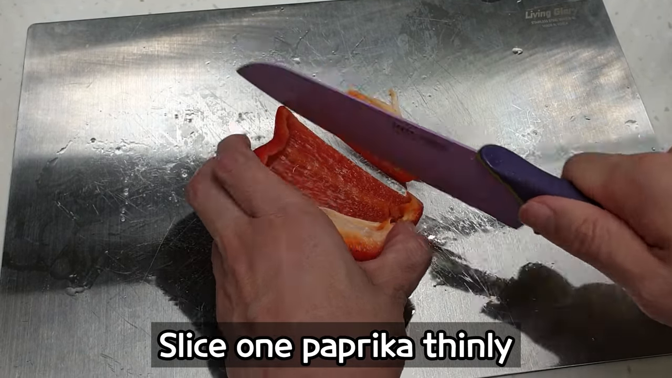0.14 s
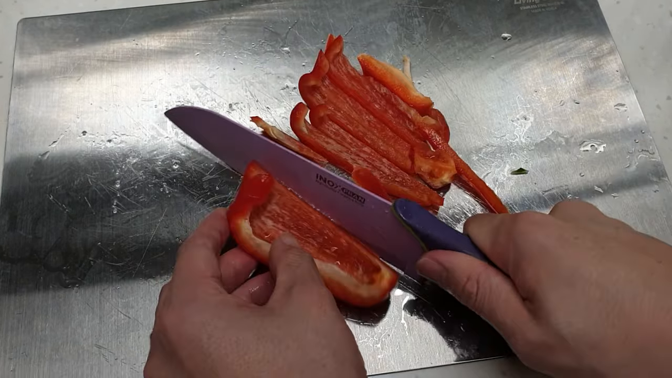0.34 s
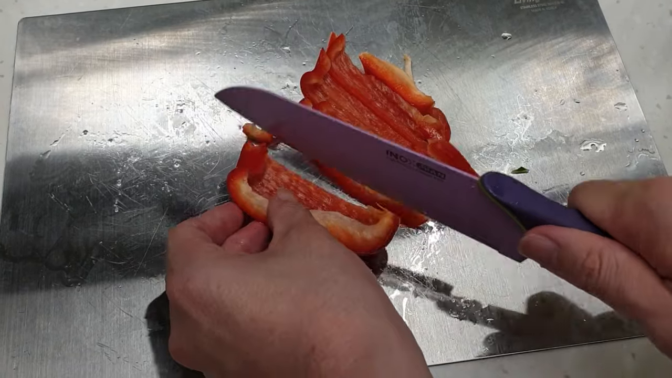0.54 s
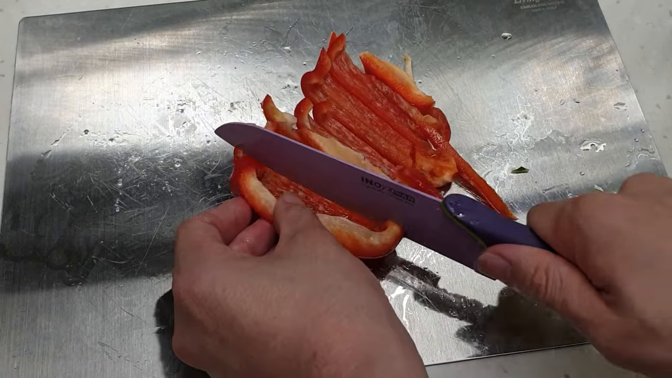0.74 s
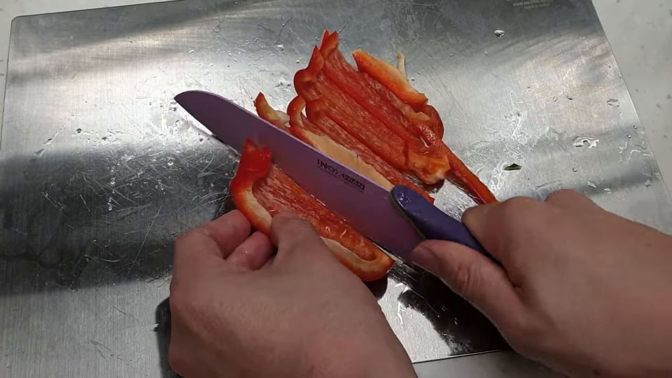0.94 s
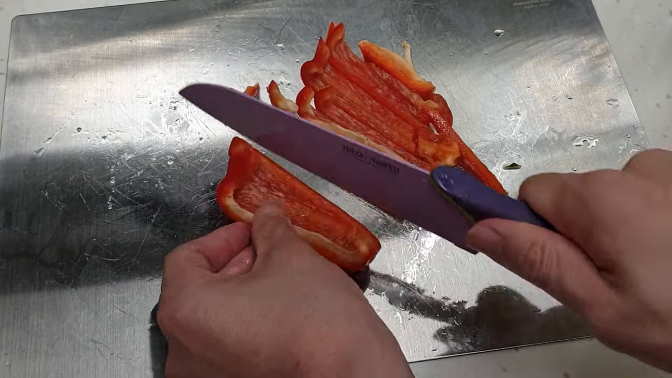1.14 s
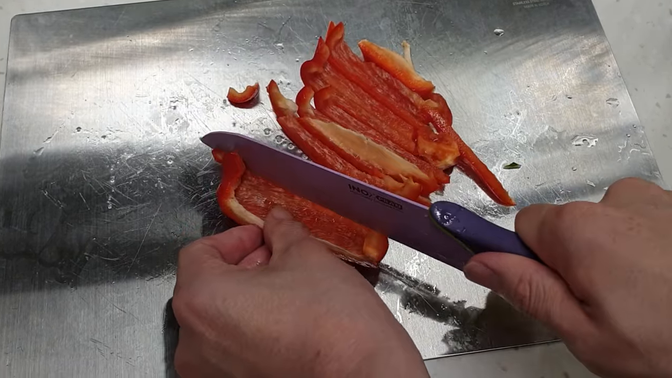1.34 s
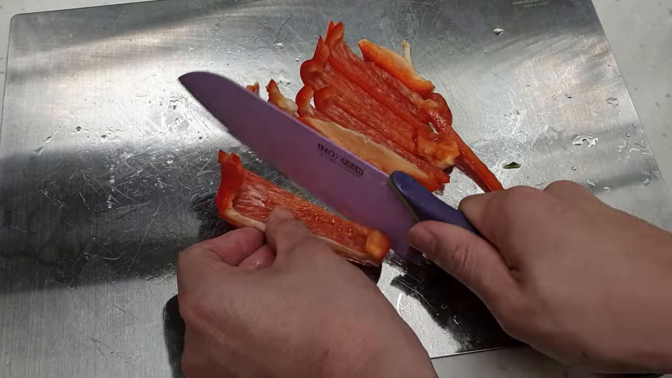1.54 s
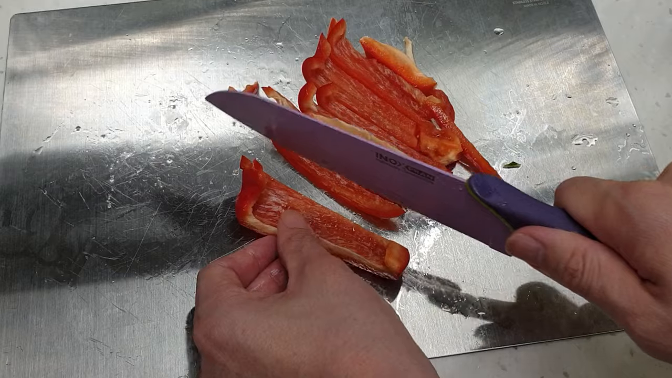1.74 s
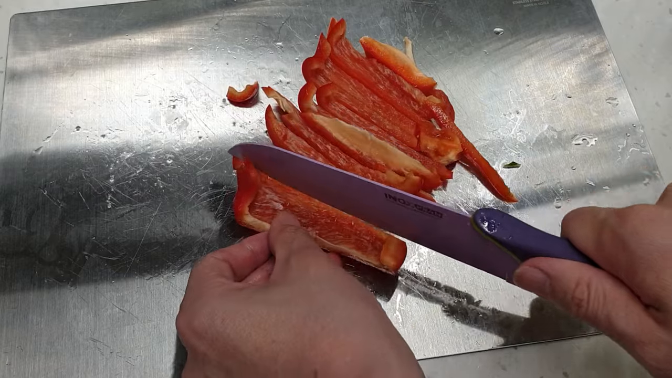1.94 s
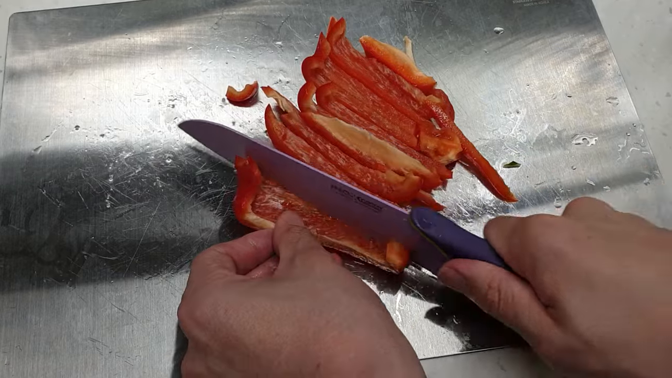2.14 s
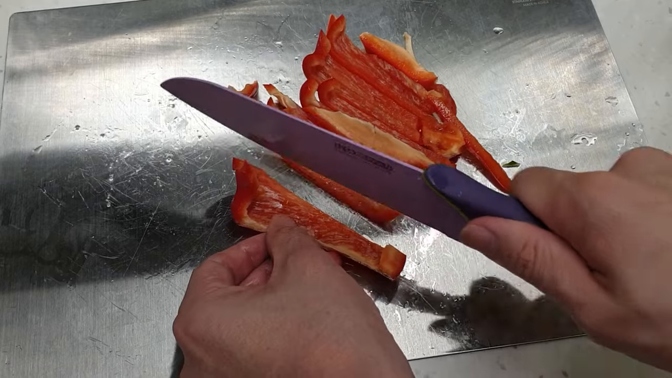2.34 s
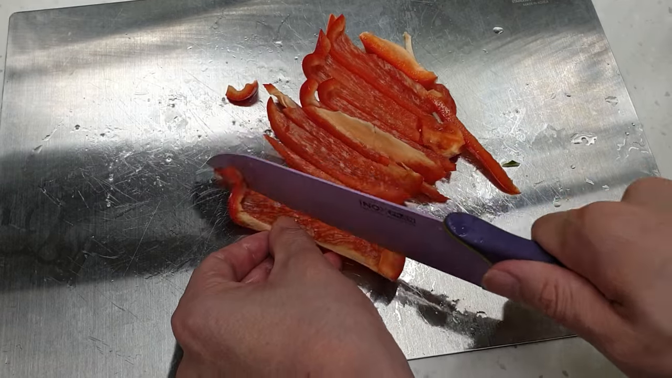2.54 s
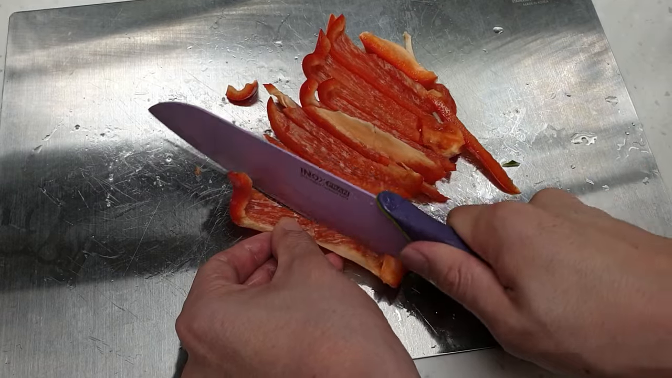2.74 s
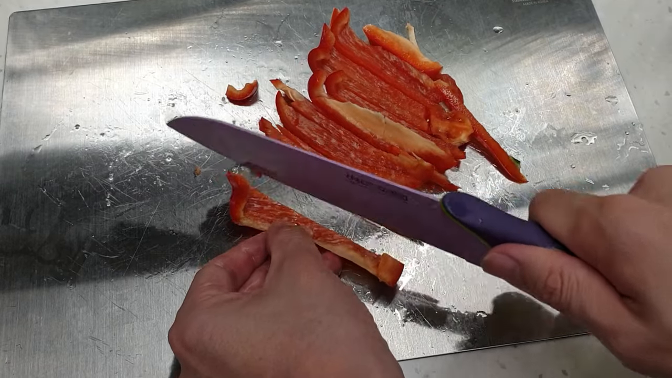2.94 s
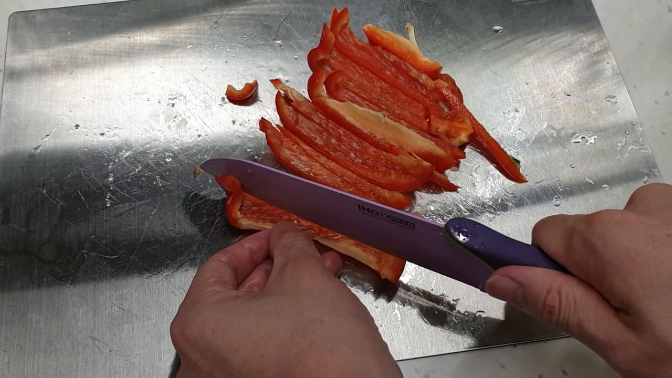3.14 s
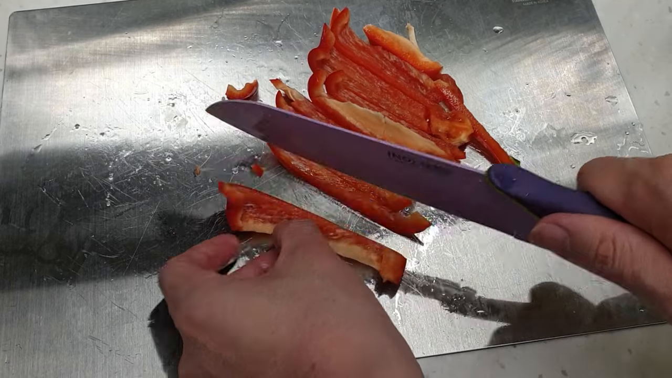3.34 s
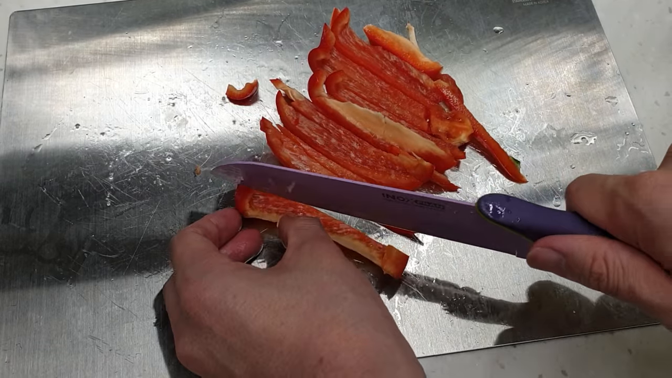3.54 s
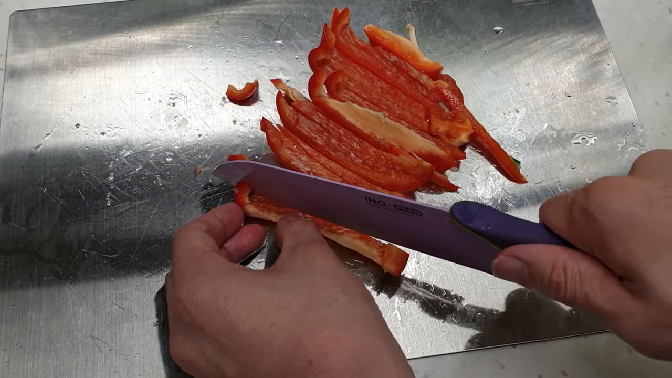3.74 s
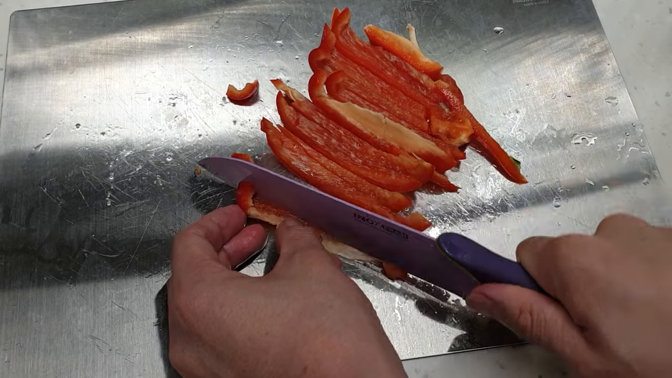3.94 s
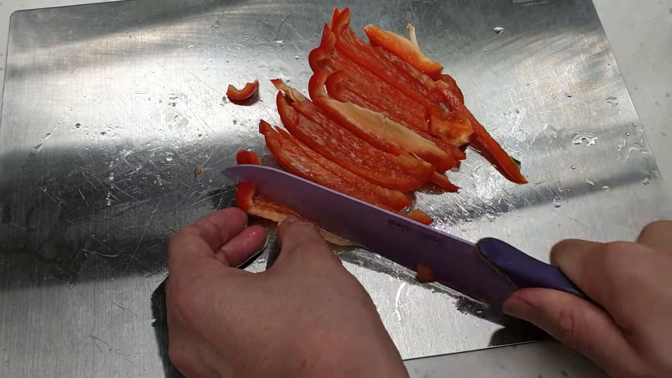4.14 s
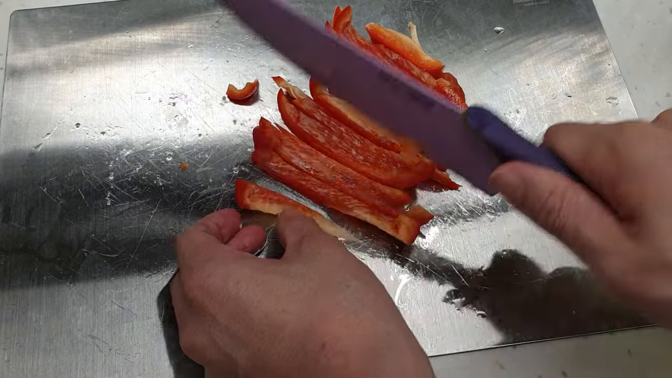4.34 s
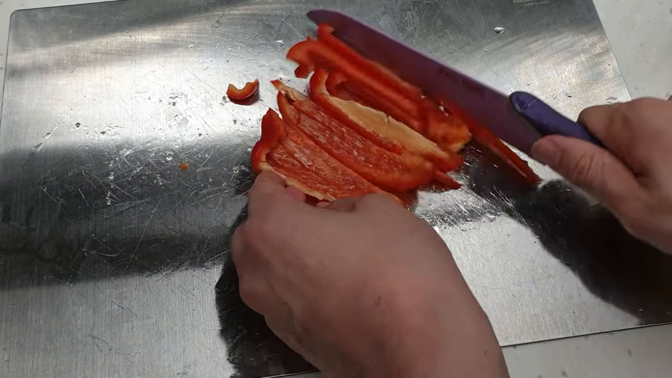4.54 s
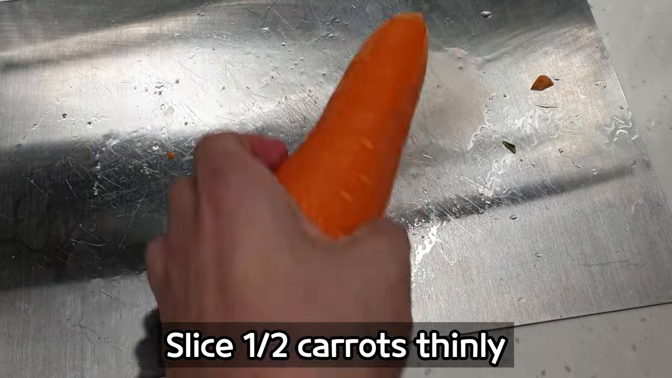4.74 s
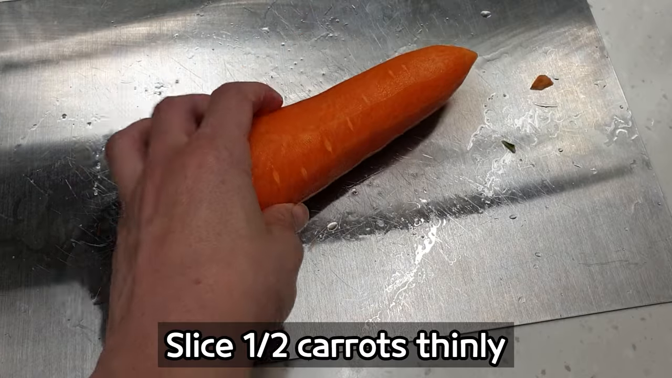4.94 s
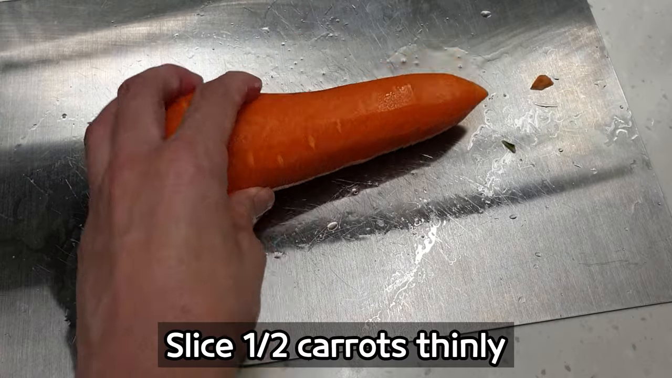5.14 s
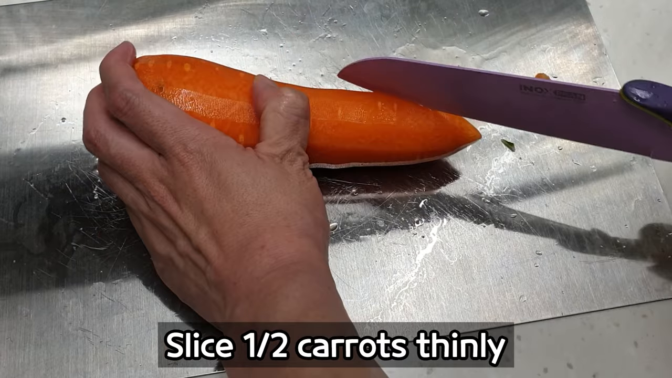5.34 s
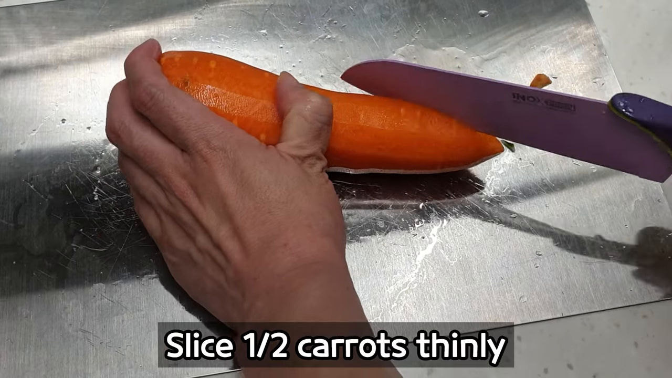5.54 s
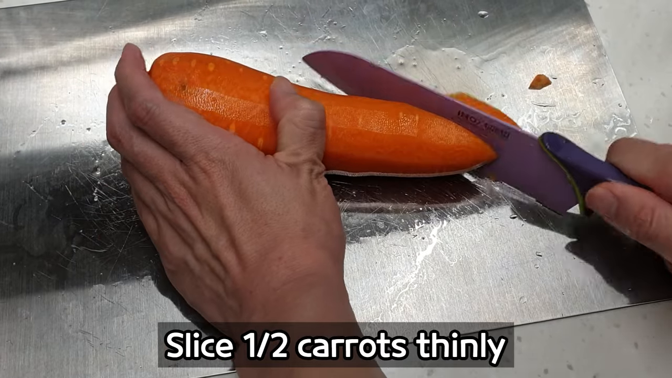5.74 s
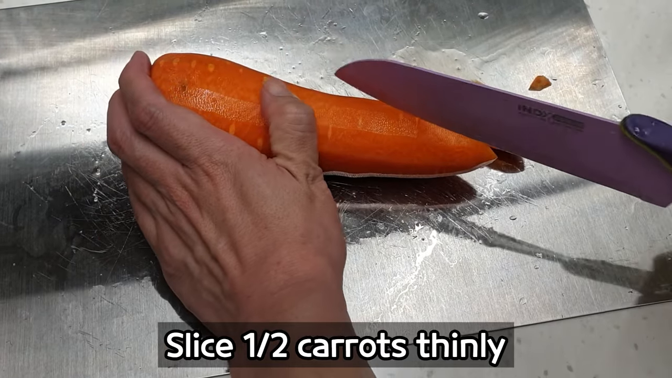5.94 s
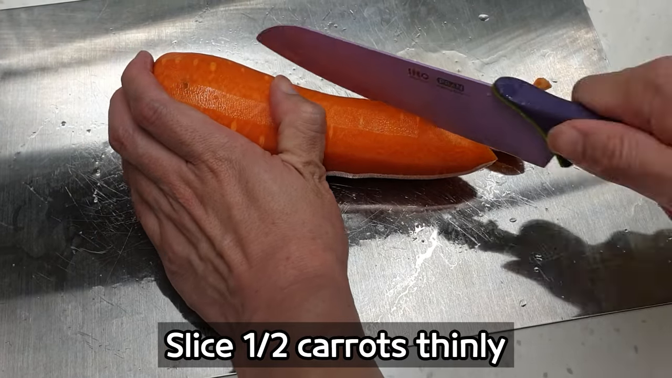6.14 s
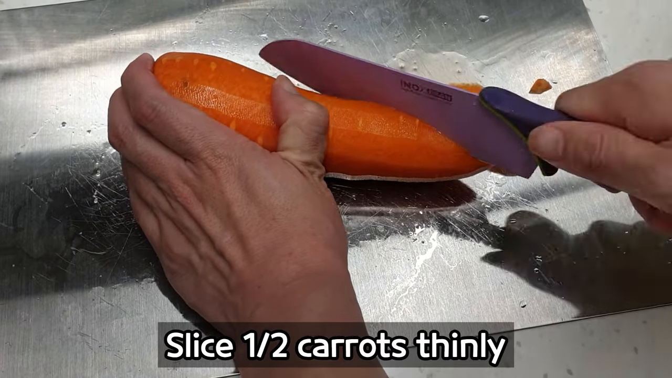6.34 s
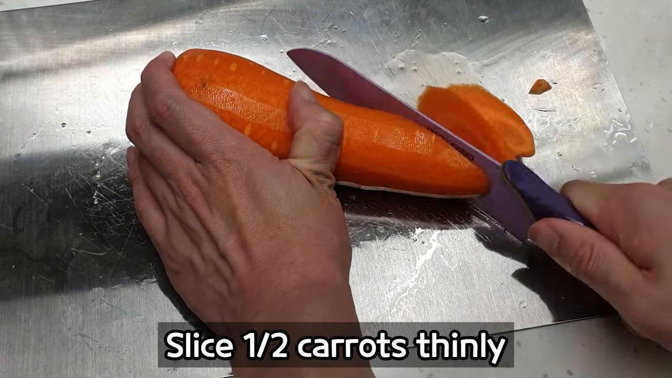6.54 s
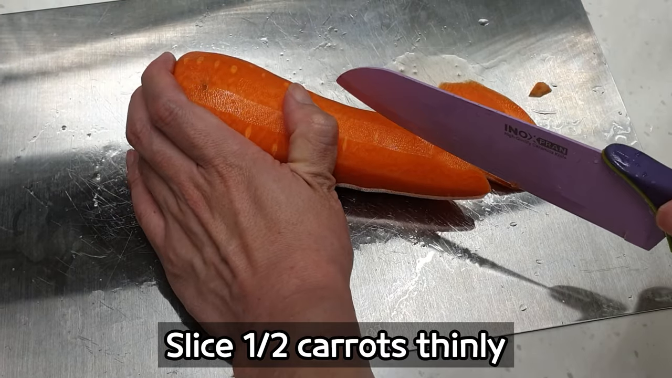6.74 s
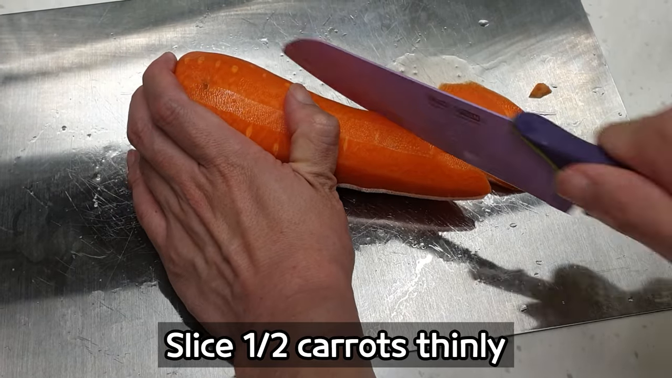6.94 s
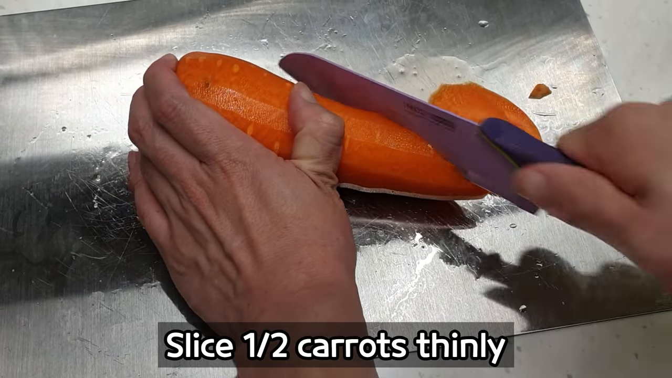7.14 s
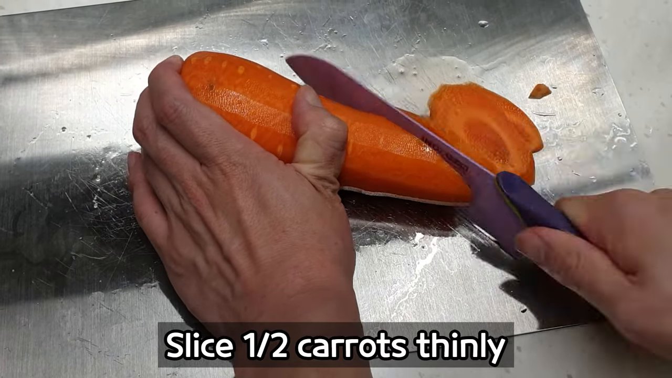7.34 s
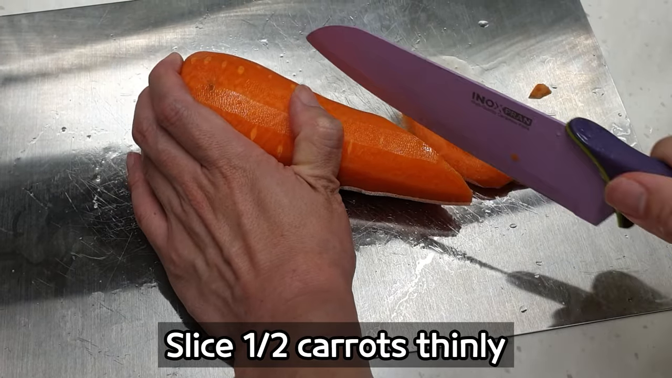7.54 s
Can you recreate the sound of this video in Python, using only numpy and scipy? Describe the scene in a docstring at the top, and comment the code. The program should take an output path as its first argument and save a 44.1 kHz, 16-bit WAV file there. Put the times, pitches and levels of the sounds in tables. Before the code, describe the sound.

In a small kitchen, a knife cuts a red pepper on a steel board: uneven wet hisses, crunches, sharp edge ticks and soft low counter thuds over a faint hum. After a tiny cut in the sound, the background changes and a carrot is handled and sliced with fewer, harder crunches. Close stereo microphone, slightly stronger on the left, short dry room tail.

```python
"""A wet blade hisses through a pepper, then a carrot, close by: noise swelling per stroke in the blade's colour.
Strokes crunch into a steel board, the edge ticks on it, and the counter thuds and shudders below: struck modes.
A small kitchen adds a short tail of sparse taps. Behind lie filtered room noise, a wavering low hum and thin whines.
The room tone steps in level at 0.2 s, and in level and colour at 4.707 s, around a 9 ms gap in all sound."""
import sys
import numpy as np
from scipy import signal
from scipy.fft import rfft, irfft, next_fast_len
from scipy.io import wavfile
from scipy.ndimage import uniform_filter1d

SR = 44100
rng = np.random.default_rng(int(sys.argv[2]) if len(sys.argv) > 2 else 0)


def transcribe(u):
    """Save the signal u as a 16-bit wav file named by the first command-line argument.

    u: samples, shape (n,) or (channels, n), limited to [-1, 1]; the rate is SR.
    q: integer samples, one column per channel.
    """
    v = np.clip(np.atleast_2d(u).T, -1, 1)
    q = np.round(v * 32767).astype(np.int16)
    wavfile.write(sys.argv[1], SR, q)


N = 334278

# blade strokes: peak t/s, relative hiss level/dB, rise and fall over 14.2 dB/ms (at least 1),
# crunch re hiss before the mix/dB
STROKES = [(0.0, -30, 10, 25, -10), (0.202, -40, 1.3, 170, -1.5), (0.244, -34, 5, 21, -32),
           (0.334, -28, 23, 32, -15), (0.356, -23, 32, 27, -14.5), (0.662, -46, 33, 160, -30),
           (0.754, -35.5, 42, 98, -3.5), (0.841, -47.5, 18, 10, 7), (0.886, -56.5, 9.2, 130, 6.5),
           (0.971, -24, 25.7, 24, -23), (1.238, -41.5, 6, 154, 9.5), (1.309, -47.5, 23, 246, 9.5),
           (1.374, -28.5, 8.2, 6.7, -22.5), (1.402, -31.5, 2.4, 4.6, 16), (1.436, -34.5, 11, 31, -37),
           (1.527, -25, 15.7, 29.4, -19), (1.748, -58, 23, 47, -21), (1.914, -46, 82, 17, -11.5),
           (1.978, -49, 84, 50, -3.5), (2.056, -31.5, 9.2, 52, 2.5), (2.131, -36, 33, 100, -2),
           (2.19, -26, 11.5, 14.4, -30), (2.409, -52.5, 26, 15, -2), (2.504, -41, 18, 82, -11),
           (2.612, -32.5, 47, 54, -2), (2.673, -46.5, 14, 55, 10.5), (2.744, -24, 14.3, 16, -17),
           (3.025, -54, 83, 116, -0.5), (3.282, -49, 65, 71, -11), (3.619, -39, 15, 24, -15),
           (3.736, -50, 25, 16, -1), (3.794, -41.5, 38, 17, 0), (3.885, -34, 29.5, 74, -18),
           (3.921, -33, 34, 54, -4), (4.117, -39, 52, 36, -7), (4.186, -34, 36, 30, -10),
           (4.471, -24, 12, 25, 5), (4.501, -23, 24, 33, -14), (4.537, -23.5, 12, 22, -7),
           (4.876, -26.5, 4.2, 31, -5), (4.927, -36.5, 44, 24.5, 0.5), (5.001, -43.5, 37, 53, -8.5),
           (5.18, -48.5, 6.2, 53, -0.5), (5.393, -43, 52, 23, -5), (5.463, -51, 37, 33, -4.5),
           (5.564, -28.5, 8.6, 103, -35), (5.591, -25.5, 36, 35, -9.5), (5.642, -39.5, 34, 6.8, 11),
           (5.733, -24, 24, 11, -8.5), (6.101, -51, 58, 32, -8.5), (6.288, -37, 40, 8.2, -12),
           (6.433, -33, 4.8, 20, -22), (6.458, -16.5, 14.5, 33, -4), (6.482, -26.5, 13, 31.6, 2),
           (6.579, -26, 26, 13.4, -17.5), (6.93, -54, 70, 48, -10.5), (7.109, -34, 39, 46, -16),
           (7.254, -32, 3.2, 35, -13), (7.274, -18, 2.1, 41, -0.5), (7.303, -24.5, 38.6, 27, -8),
           (7.397, -28, 17, 16.7, -13)]
# faint rustle on the wet steel between strokes: t/s, relative level/dB
RUSTLE = [(0.0, -55), (0.199, -80), (0.5, -86), (0.9, -55), (1.3, -59), (1.6, -68), (2.0, -54), (2.4, -61),
          (3.0, -66.5), (3.65, -60.5), (4.03, -53), (4.25, -69), (4.7, -66), (4.72, -95), (5.3, -60),
          (5.8, -86), (6.3, -60), (6.75, -84), (7.05, -61.5), (7.58, -91.5)]
# edge meets the steel: t/s, relative level/dB, board ring re tick before the mix/dB
TICKS = [(0.2407, -15.5, -40), (0.337, -14, -45), (0.7716, -22.5, -22.5), (0.884, -29, -37),
         (1.368, -22, -24), (1.4013, -3.5, -24), (1.435, -19, -42), (2.0542, -8.5, -21),
         (2.606, -21.5, -10.5), (2.6725, -29.5, -9.5), (3.795, -11.5, -21), (3.874, -30, -26),
         (3.8835, -24, -28.5), (4.869, -29.5, -3), (4.8782, -15, -18), (5.179, -44.5, 0), (5.5912, -12, -8),
         (5.646, -36.5, 0), (6.448, -19, -4.5), (6.4584, -9, -10), (7.105, -26.5, -28),
         (7.2535, -19.5, -45), (7.2696, -3, -18.5)]
# weight lands on the counter: t/s, relative level/dB, hardness/(dB per octave)
THUDS = [(0.194, -30, -7), (0.24, -37, 5.5), (0.732, -25.5, -5.5), (1.383, -19.5, 1), (2.052, -30.5, 2.5),
         (2.125, -33, 4.5), (2.601, -28.5, 1), (2.674, -24.5, -1), (3.625, -23.5, -10.5), (3.785, -46, 1),
         (3.876, -37.5, 6.5), (4.465, -19.5, -7), (4.536, -43.5, -4.5), (4.868, -10.5, 1.5),
         (4.905, -28.5, 1), (4.995, -49, 10.5), (5.18, -27.5, -4.5), (5.465, -32.5, -8.5),
         (5.613, -15, -12), (5.639, -24, 0.5), (5.695, -34, 4.5), (5.908, -34.5, -12), (6.101, -42.5, -7),
         (6.341, -26, -11), (6.454, -21.5, -10.5), (6.575, -43.5, 5), (6.732, -27, -16.5),
         (7.101, -32.5, -1), (7.269, -23, -2)]
# counter shudders while the blade is pressed through: start t/s, start to release/s, relative level/dB,
# hardness/(dB per octave)
SHUDDERS = [(1.212, 0.15, -42.5, 6), (5.526, 0.089, -42.5, -5), (6.225, .075, -50, -12.5),
            (6.462, 0.059, -36, -3.5), (7.055, 0.11, -49.5, -5.8), (7.283, 0.1, -47, -4.5)]
# counter modes: f/Hz, relative level/dB, t60 before hand damping/s
COUNTER_MODES = [(104.8, 4.5, 0.081), (138, 0.5, 0.04), (170.8, -3.5, 0.088), (213.6, -5.5, 0.067),
                 (267, -7.5, 0.1), (386.5, -14, 0.095), (472, -18, 0.066)]
# broad modes of the steel board: f/Hz, width/Hz, relative level/dB
BOARD_MODES = [(167.2, 46, 6), (290, 45, 7.5), (432, 190, 7.5), (673, 95, 5.5), (820, 130, 5),
               (1108, 320, 4), (1306, 200, 1.5), (1650, 150, -5.5), (2170, 540, 0), (2640, 200, -5.5)]
# blade colour: f/Hz, relative density/(dB per Hz)
BLADE_COLOUR = [(710, -52), (1200, -24.5), (1610, -15), (2430, -11.5), (3290, -9.5), (3700, -10),
                (5350, -8.5), (7100, -4), (8630, -13.5), (9930, -9.5), (11100, -6.5), (13900, -5),
                (16000, -10.5)]
# kitchen decay: f/Hz, t60/s
KITCHEN_T60 = [(100, 0.47), (500, 0.16), (2000, 0.2), (6000, 0.15), (14000, 0.15)]
# room tone colour under the pepper: f/Hz, relative density/(dB per Hz)
PEPPER_TONE = [(13, -43), (22, -19), (64, -10), (92, -12.5), (128, -14), (147, -22), (205, -21), (432, -27),
               (539, -33), (935, -35.5), (1070, -36), (1670, -39.5), (2520, -48.5), (5930, -61.5),
               (16000, -75)]
# room tone colour under the carrot: f/Hz, relative density/(dB per Hz)
CARROT_TONE = [(13, -46.5), (22, 10), (115, 10), (618, -13.5), (750, -9), (1300, -17.5), (1410, -17.5),
               (2080, -22), (3320, -51), (7190, -60), (7810, -36), (9480, -26), (10300, -40),
               (13600, -21.5), (16000, -32)]
# hum between the two steps: t/s, mean level before the left-right tilt/dB
HUM_LEVEL = [(0.2, -44), (0.5, -42), (0.75, -51), (0.95, -42), (1.3, -51.5), (1.8, -50), (2.2, -52),
             (2.4, -67), (2.8, -51), (3.12, -55), (3.3, -52), (3.6, -47), (3.92, -62), (4.1, -51),
             (4.45, -54), (4.6, -64), (4.7, -64)]
# faint appliance tones after the second step: f/Hz, relative level/dB
WHINES = [(845.2, -78.5), (1163, -80), (1276, -83)]
# left-right likeness: f/Hz, correlation/1
LIKENESS = [(60, .95), (130, .95), (290, .85), (640, .35), (1410, 0.01), (4500, .05), (6820, .35),
            (15000, .45)]
# left-right tilt, scaled per layer in pair(): f/Hz, left re right/dB
TILT = [(60, -0.5), (180, -4), (550, -4), (1650, -4), (4970, -4.5), (15000, -4.5)]
# difference of the microphone ports: f/Hz, left re right/dB
PORTS = [(4500, -0.5), (6900, -8.5), (7600, -6), (8600, 5.5), (11800, 0.5), (14500, -4.5), (16000, -13)]

STEPS_S, GAP_S = (0.2, 4.707), (4.701, 4.71)
# before, between and after the steps
TONE_RMS_DB, BRIGHT_DB = (-51, -50, -55.5), (0.5, 5, 11)
BRIGHT_PER_DB, BRIGHT_REF_DB = -0.07, -35  # negative: louder strokes are duller
SPLIT_HZ = 7630  # the hiss is tipped about this frequency
STROKE_ROUNDNESS = 1.6  # exponent of the swell and fade in dB
JUDDER_DB, PATCH_DB = 2, 2.6  # stick-slip depth; depth of the blade's passing rings
# left re right; a stroke of TURN crunch stands halfway
THIN_PAN_DB, CRUNCHY_PAN_DB, RUSTLE_PAN_DB, PAN_TURN_DB = -6.5, -1, -1.86, -12
CRACK_RISE_S, CRACK_T60_S, RATTLE_T60_S, BLOW_T60_S, SPOT_T60_S = 0.00088, 0.007, 0.02, 0.062, 0.019
SPOT_HZ = (1525, 1080)  # pepper, carrot
KNOCK_HZ, KNOCK_DB, KNOCK_DB_PER_HARD = 230, -6.5, 0.68
HAND_DAMPING = 0.87  # factor on the thud t60
SHUDDER_RISE_S, SHUDDER_FALL_S, SHUDDER_WIDTH_HZ = 0.024, 0.033, 28
HUM_HZ, HUM_WAVER_HZ, HUM_WAVER_DB = 60.2, 2.42, 0.5  # wavers are rms
WHINE_WIDTH_HZ = 23
EDGE_HZ = 15800


def slicing():
    """Each stroke swells and fades; it hisses in the blade and crunches into the board."""
    t = np.arange(N) / SR
    stroke, crunch, pan_power = np.zeros((3, N))
    for s, db, rise_ms, fall_ms, crunch_db in STROKES:
        near = slice(max(round((s - 0.4) * SR), 0), round((s + 0.5) * SR))
        late_ms = 1000 * (t[near] - s)
        reach = np.where(late_ms < 0, -late_ms / max(rise_ms, 1), late_ms / max(fall_ms, 1))
        power = gain_of(2 * (db - 14.2 * reach ** STROKE_ROUNDNESS))
        crunchy = 1 / (1 + gain_of(PAN_TURN_DB - crunch_db))
        stroke[near] += power
        crunch[near] += power * gain_of(2 * crunch_db)
        pan_power[near] += power * (THIN_PAN_DB + (CRUNCHY_PAN_DB - THIN_PAN_DB) * crunchy)

    # the blade sticks and slips every few ms
    judder = gain_of(2 * JUDDER_DB * slow_noise(300))
    stroke, crunch, pan_power = stroke * judder, crunch * judder, pan_power * judder
    rustle = gain_of(2 * np.interp(t, *np.transpose(RUSTLE)))
    total = stroke + rustle
    pan_db = (pan_power + RUSTLE_PAN_DB * rustle) / total

    # power share of the upper band
    loud_db = 10 * np.log10(total) - BRIGHT_REF_DB
    bright_db = np.array(BRIGHT_DB)[np.searchsorted(STEPS_S, t)] + BRIGHT_PER_DB * loud_db
    share = 1 / (1 + gain_of(-2 * bright_db))

    hz = frequencies()
    colour = gain_of(read(BLADE_COLOUR, hz))
    upper = 1 / (1 + (SPLIT_HZ / (hz + 1)) ** 12)
    low_hiss = grit(2.7, size=40) * np.sqrt(stroke * (1 - share) + 0.21 * rustle)
    high_hiss = grit(2.1, size=40) * np.sqrt(stroke * share + 0.47 * rustle)
    hiss = shaped(low_hiss, unit(colour * np.sqrt(1 - upper)))
    hiss += shaped(high_hiss, unit(colour * np.sqrt(upper)))
    hiss = pair(patchy(hiss, PATCH_DB), lean=0) * gain_of([pan_db / 2, -pan_db / 2])
    crunching = pair(board(grit(3.56, size=60) * np.sqrt(crunch)))
    return gain_of(-3.5) * hiss + gain_of(-7.5) * crunching


def patchy(x, patch_db):
    """Narrow rings of the blade come and go as the contact point slides."""
    z = signal.stft(x, nperseg=512, noverlap=384)[2]
    field = rng.standard_normal(z.shape[1:])
    field = uniform_filter1d(field, size=2, axis=0)
    for size in (10, 6):
        field = uniform_filter1d(field, size=size, axis=1)
    out = signal.istft(z * gain_of(patch_db * evened(field)), nperseg=512, noverlap=384)[1][:, :N]
    return out * np.sqrt(np.mean(x ** 2) / np.mean(out ** 2))


def board(x):
    """The damped steel sheet answers with a few broad modes."""
    hz = frequencies()
    modes = sum(gain_of(db) * resonance(hz, f, width) for f, width, db in BOARD_MODES)
    return shaped(x, unit(modes))


def ticks():
    """A millisecond crack with a short rattle, and the blow that rings the board and the spot that was hit."""
    t = np.arange(3000) / SR
    crack, blow, spot = np.zeros((3, 2, N))
    fade = gain_of(-60 * t / CRACK_T60_S) + 0.18 * gain_of(-60 * t / RATTLE_T60_S)
    envelope = fade * np.minimum(t / CRACK_RISE_S, 1)
    for (s, db, ring_db), noise in zip(TICKS, rng.standard_normal((len(TICKS), 4, len(t)))):
        add(crack, s, gain_of(db - 5.5) * noise[:2] * envelope)
        add(blow, s, gain_of(db + ring_db + 0.5) * noise[2:] * gain_of(-60 * t / BLOW_T60_S))
        spot_hz = SPOT_HZ[int(s > STEPS_S[1])]
        ring = np.sin(2 * np.pi * spot_hz * t + 3 * noise[2:, :1])  # random phase per side
        add(spot, s, gain_of(db + ring_db + 8 - 60 * t / SPOT_T60_S) * ring)
    bright = shaped(crack, unit(gain_of(0.39 * read(BLADE_COLOUR, frequencies()))))
    return pair(bright, lean=2.2) + pair(board(blow) + spot)


def thuds():
    """A soft push gives a dull knock and rings the low modes of the counter, each blow a little differently."""
    t, out = np.arange(16000) / SR, np.zeros((2, N))
    knock = t / 0.0065 * np.exp(1 - t / 0.0035) * -np.sin(2 * np.pi * KNOCK_HZ * t)
    chances = rng.standard_normal((len(THUDS), len(COUNTER_MODES), 3))
    for (s, db, hard_db), chance in zip(THUDS, chances):
        add(out, s, gain_of(db + KNOCK_DB + KNOCK_DB_PER_HARD * hard_db) * knock[None])
        for (hz, mode_db, t60), vary in zip(COUNTER_MODES, chance):
            rise = 1 - np.exp(-(0.97 * hz * t) ** 2)  # a mode builds in about one cycle
            start_db = db + mode_db + hard_db * octaves_up(hz) + 0.57 * vary[0]
            level = gain_of(start_db - 60 * t / (t60 * HAND_DAMPING))
            turns = hz * (1 + 0.023 * vary[1:, None]) * t  # each side slightly detuned
            add(out, s, -level * rise * np.sin(2 * np.pi * turns))
    return pair(out)


def shudder():
    """Uneven pressure keeps the counter modes going, damped by the hand into broad humps."""
    t, hz, out = np.arange(N) / SR, frequencies(), 0
    push = rng.standard_normal((2, N))
    for s, length, db, hard_db in SHUDDERS:
        corners_s = (0, SHUDDER_RISE_S, length, length + SHUDDER_FALL_S)
        level = gain_of(db) * np.interp(t - s, corners_s, (0, 1, 1, 0))
        modes = sum(gain_of(mode_db + hard_db * octaves_up(f)) * resonance(hz, f, SHUDDER_WIDTH_HZ)
                    for f, mode_db, _ in COUNTER_MODES)
        out = out + shaped(push * level, unit(modes))
    return pair(out)


def kitchen(x):
    """Reverberates by sparse taps of random sign, each band dying at its own speed."""
    taps = np.zeros((2, SR // 2))
    grid = np.arange(150, SR // 2 - 20, 20)
    at = grid + rng.integers(0, 20, (2, len(grid)))
    np.put_along_axis(taps, at, rng.choice([-1., 1.], at.shape), 1)
    hz, t, z = signal.stft(taps, SR, nperseg=256)
    decay = gain_of(-60 * t / read(KITCHEN_T60, hz)[:, None])
    tail = signal.istft(z * decay, SR, nperseg=256)[1]
    return signal.oaconvolve(x, tail / np.linalg.norm(tail[0]), axes=1)[:, :N]


def room_tone():
    """Steady air and appliance noise, with another colour after the second step."""
    t, hz = np.arange(N) / SR, frequencies()
    part = np.searchsorted(STEPS_S, t)
    pepper, carrot = (evened(shaped(grit(2.3, size=3000), gain_of(read(tone, hz))))
                      for tone in (PEPPER_TONE, CARROT_TONE))
    return pair(np.where(part == 2, carrot, pepper) * gain_of(np.array(TONE_RMS_DB)[part]))


def hum():
    """A low sine between the steps; it wavers in level and pitch."""
    t = np.arange(N) / SR
    wobble = slow_noise(2500)
    turns = np.cumsum(HUM_HZ + HUM_WAVER_HZ * wobble) / SR
    level_db = np.interp(t, *np.transpose(HUM_LEVEL), left=-120, right=-120)
    level_db = level_db + HUM_WAVER_DB * wobble[::-1]  # reversed: level does not track pitch
    tone = np.sqrt(2) * gain_of(level_db) * np.sin(2 * np.pi * turns)
    return tone * gain_of([[-1.5], [0.8]])


def whine():
    """Thin fuzzy tones after the second step: noise in narrow peaks."""
    hz = frequencies()
    tones = sum(gain_of(db) * unit(1 / (1 + ((hz - f) / WHINE_WIDTH_HZ) ** 2)) for f, db in WHINES)
    return pair(shaped(rng.standard_normal((2, N)), tones)) * (np.arange(N) / SR > STEPS_S[1])


def gain_of(db):
    """Decibels to a factor."""
    return 10 ** (np.asarray(db) / 20)


def evened(x):
    """Scales to rms 1."""
    return x / np.sqrt(np.mean(x ** 2) + 1e-20)


def slow_noise(size):
    """Noise smoothed twice over size samples, rms 1."""
    return evened(uniform_filter1d(uniform_filter1d(rng.standard_normal(N), size), size))


def grit(lumpy_db, size):
    """Noise in lumps, as cells burst unevenly; both renderings share the lumps."""
    lumps = gain_of(lumpy_db * slow_noise(size))
    return evened(lumps * rng.standard_normal((2, N)))


def octaves_up(hz):
    """Octaves above the lowest counter mode."""
    return np.log2(hz / COUNTER_MODES[0][0])


def resonance(hz, f, width):
    """Response of one damped mode, 1 at its peak."""
    return 1j * hz * width / (f ** 2 - hz ** 2 + 1j * hz * width)


def read(points, hz):
    """Reads a spectrum table on a log axis."""
    f, value = np.transpose(points)
    return np.interp(np.log(hz + 1), np.log(f + 1), value)


def add(mix, s, sound):
    """Mixes a sound in at time s."""
    part = mix[..., max(round(s * SR), 0):][..., :sound.shape[-1]]
    part += sound[..., :part.shape[-1]]


def frequencies():
    """The grid of shaped(), in Hz."""
    return np.fft.rfftfreq(next_fast_len(N + 4096), 1 / SR)


def shaped(x, gain):
    """Filters by a gain on the grid of frequencies()."""
    size = next_fast_len(N + 4096)
    return irfft(rfft(x, size) * gain, size)[..., :N]


def unit(gain):
    """Scales a filter so that white noise keeps its power."""
    return gain / np.sqrt(np.mean(abs(gain) ** 2))


def pair(two, lean=0.63):
    """Two renderings become left and right, alike by LIKENESS and tipped by lean times TILT."""
    hz = frequencies()
    same = np.clip(read(LIKENESS, hz), -1, 1)
    tip = gain_of(lean * read(TILT, hz) / 2)
    left = shaped(two[0], tip)
    right = shaped(two[0], same / tip) + shaped(two[1], np.sqrt(1 - same ** 2) / tip)
    return np.array([left, right])


def scene():
    """The cutting with its room tail, over the room tone; the counter's low sounds stir the room less."""
    blade = slicing() + ticks()
    counter = thuds() + shudder()
    tail = pair(kitchen(gain_of(-10.5) * blade + gain_of(-15.5) * counter), lean=0)
    background = room_tone() + hum() + whine()
    t = np.arange(N) / SR
    sounding = (t < GAP_S[0]) | (t > GAP_S[1])
    return (blade + counter + tail + background) * sounding


def record(dry):
    """The colour of the two microphone ports, then the band limit."""
    tip_db = read(PORTS, frequencies()) / 2
    heard = shaped(dry, gain_of([tip_db, -tip_db]))
    low_pass = signal.firwin(511, EDGE_HZ, window=("kaiser", 9), fs=SR)
    return signal.oaconvolve(heard, low_pass[None], "same")


dry = scene()
out = record(dry)
transcribe(out)
```